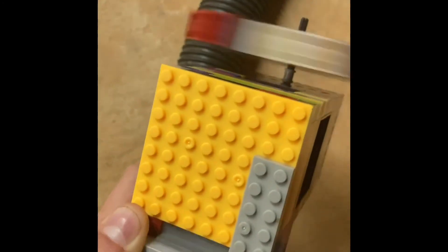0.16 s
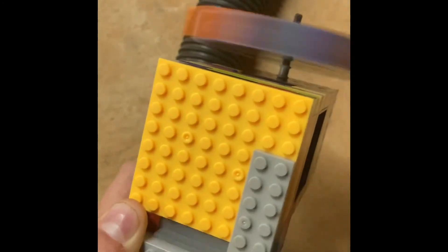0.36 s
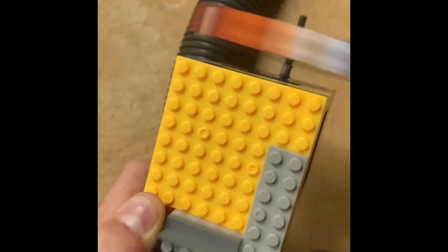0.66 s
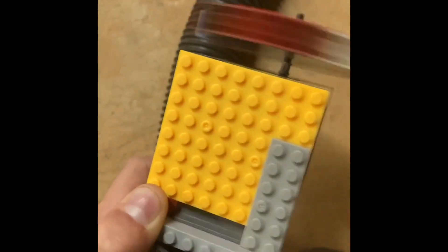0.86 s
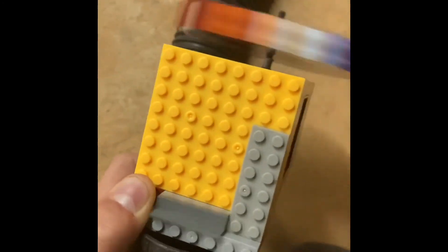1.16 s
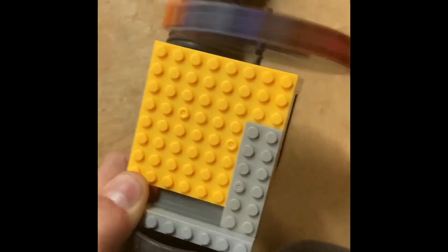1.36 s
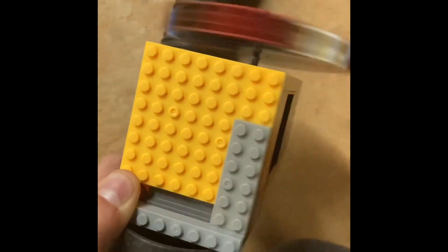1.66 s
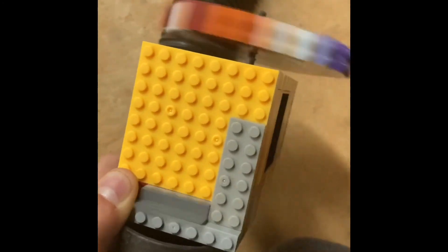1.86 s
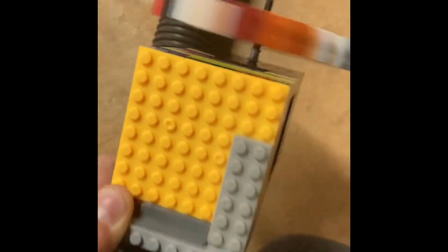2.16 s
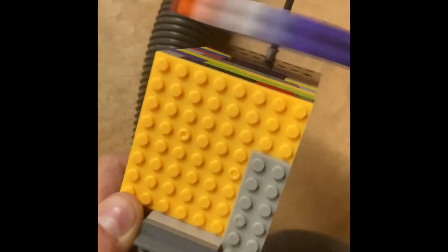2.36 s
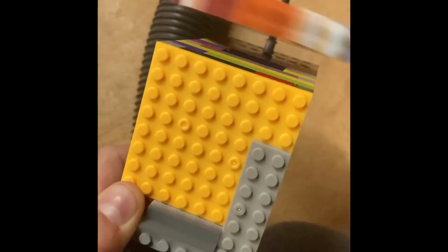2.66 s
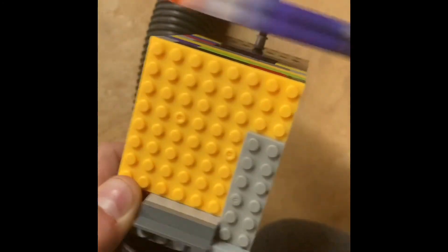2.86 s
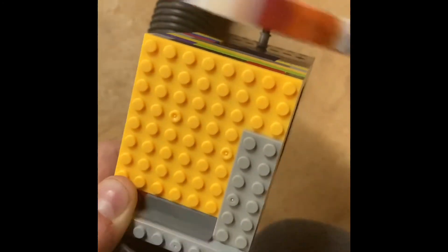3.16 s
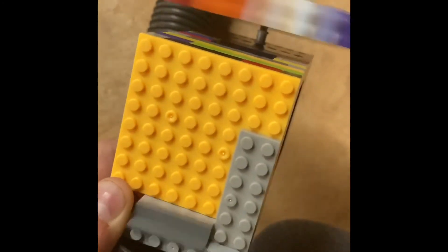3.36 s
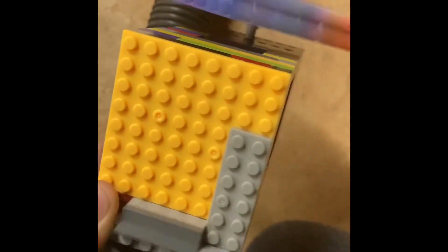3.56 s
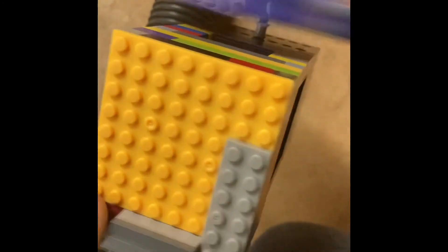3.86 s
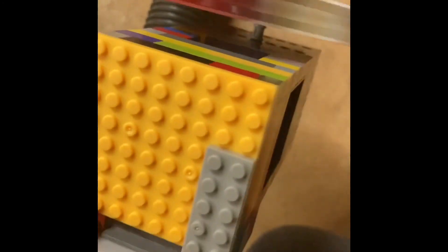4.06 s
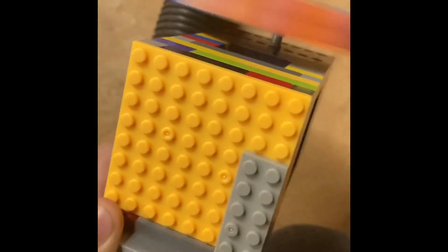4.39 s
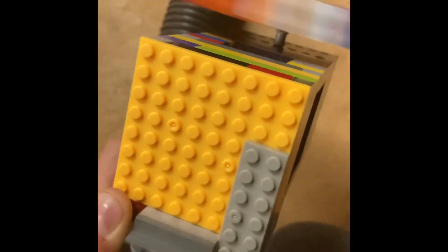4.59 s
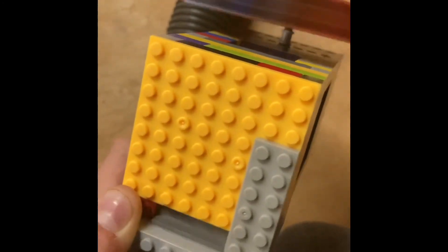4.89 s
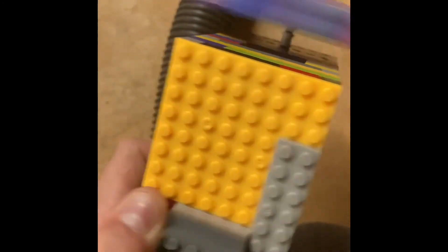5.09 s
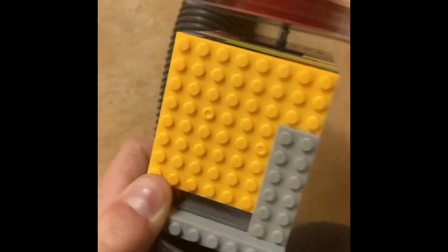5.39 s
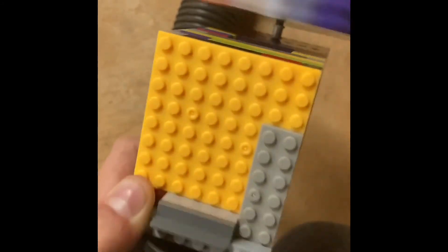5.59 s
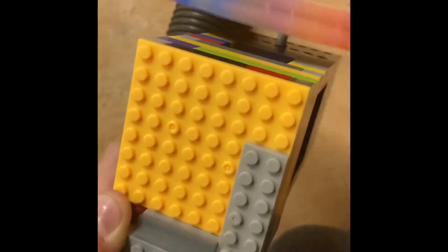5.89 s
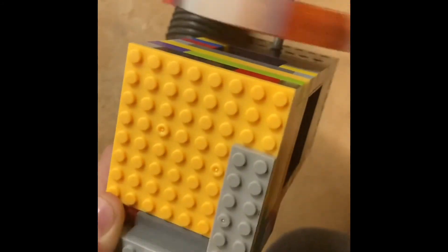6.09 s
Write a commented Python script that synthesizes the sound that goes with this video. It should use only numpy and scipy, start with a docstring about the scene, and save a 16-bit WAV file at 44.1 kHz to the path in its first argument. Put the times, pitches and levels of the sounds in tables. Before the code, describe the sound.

A vacuum's tonal hum and broad airy roar run throughout, driving a small plastic engine close to a stereo microphone. Its rapid knock-squawk-knock chatter starts fast and even, then drags to under six turns a second as bright air leaks and the motor pitch drops. The hiss stops, the rattle quickens and the hum rises, before a brief second leak and recovery. Little room reflection.

```python
"""A vacuum's motor hums over rushing air, and its suction drives a toy piston engine close to the microphone.
On most turns of the flywheel the crank squeaks; the plastic piston knocks, squawks and knocks on its return.
When the hose sits loosely, air hisses through the gap, the hum sinks in pitch and the engine slows.
Hum, squawks and squeaks are sine tones; air is coloured noise; knocks and rubbing are clicks ringing the housing.
It is heard in stereo, with a little of a small room around it."""
import sys
import numpy as np
from scipy import signal
from scipy.fft import rfft, irfft
from scipy.io import wavfile
from scipy.ndimage import uniform_filter1d

SR = 44100
rng = np.random.default_rng(int(sys.argv[2]) if len(sys.argv) > 2 else 0)


def bounce(signal):
    """Save signal as a 16-bit WAV file at the path given by the first command-line argument."""
    frames = np.transpose(np.atleast_2d(signal))
    limited = np.clip(frames, -1, 1)
    pcm = np.round(limited * 32767).astype(np.int16)
    wavfile.write(sys.argv[1], SR, pcm)


N = 275184
TIME = np.arange(N) / SR  # s
FREQS = np.maximum(np.fft.rfftfreq(N, 1 / SR), 1)  # Hz, kept above zero for logarithms
TOP_HZ = 15720  # upper limit of the recorder
START_TURN = .4745  # flywheel angle at the start, turns
CRUISE_TURNS_PER_S = 8
STROKE_DB, STROKE_DB_PER_SPEED = -21.5, 2.06  # rubbing at cruising speed, and rise per extra turn a second
RUSH_DB = -30.5  # the vacuum's roar at the peak of its throb, before slow wavering
VALVE_HZ = 5650  # the valve shapes the hiss above this

# Speed of the flywheel. Each row: time in seconds, speed in turns per second.
FLYWHEEL_SPEED = [(0.0, 8.557), (0.443, 8.455), (0.807, 8.225), (1.006, 7.703), (1.736, 6.777),
                  (1.985, 6.299), (3.129, 5.728), (3.486, 5.998), (3.906, 7.29), (4.127, 8.019),
                  (4.377, 8.345), (5.047, 8.441), (5.264, 7.841), (5.65, 7.015), (5.868, 7.718),
                  (6.24, 8.166)]
# The vacuum motor, slowed while the hose leaks. Each row: time in seconds, pitch of the hum in Hz.
MOTOR_PITCH = [(0, 364.3), (.75, 365.4), (1.45, 353), (2.05, 347.7), (3.05, 345.2), (3.55, 347.5),
               (4.2, 365.3), (4.6, 366), (5.12, 364.3), (5.65, 352.5), (6.08, 363.5)]
# Level of the hum. Each row: time in seconds, level in dB.
HUM_LEVEL = [(0, -27.5), (.8, -28), (1.05, -28.5), (1.35, -25), (1.9, -30), (2.2, -32.5), (3, -36),
             (3.55, -32.5), (3.8, -26.5), (4.15, -29.5), (4.7, -29.5), (5.6, -26), (6.1, -29.5)]
# Overtones of the hum. Each row: multiple of its pitch, relative level in dB.
HUM_OVERTONES = [(2, 0), (3, -15), (4, -13), (6, -17)]
# Common level of those overtones. Each row: time in seconds, level in dB.
OVERTONE_LEVEL = [(0, -41), (.55, -38.8), (.8, -42), (1.2, -37.5), (1.9, -36.8), (2.8, -37.3), (3.5, -39),
                  (4.1, -39.3), (4.85, -38.5), (5.1, -43), (5.55, -39.5), (6.24, -40.5)]
# Colour of the vacuum's rush. Each row: frequency in Hz, relative density in dB per Hz.
RUSH_COLOUR = [(25, -52), (60, -22), (125, -6), (182, 5.5), (230, 1), (280, -7), (430, -4), (510, -17),
               (620, -19), (850, -9), (1600, -7.5), (2200, -10.5), (2750, -17.5), (3300, -10),
               (4600, -13.5), (5600, -16.5), (8000, -16.5), (11000, -23), (15500, -38)]
# Power of the rush that arrives from all round. Each row: frequency in Hz, share from 0 to 1.
DIFFUSE_SHARE = [(60, .01), (350, .01), (700, .4), (1400, .6), (2500, .75), (4000, .65), (5500, .3),
                 (10000, .25)]
# Colour of the draught's buffeting. Each row: frequency in Hz, relative density in dB per Hz.
BUFFET_COLOUR = [(25, -50), (38, -49), (52, -6), (68, 5), (110, 0.5), (200, -10), (400, 0.5), (600, -19),
                 (1500, -24.5)]
# Buffeting at the hose mouth. Each row: time in seconds, relative level in dB.
BUFFET_LEVEL = [(0, -37), (1.12, -37.5), (1.22, -30), (2, -35.5), (2.6, -30.5), (3.33, -32), (3.52, -44),
                (4.6, -39), (5.5, -41), (6.24, -39)]
# Colour of the hiss at the loose hose. Each row: frequency in Hz, relative density in dB per Hz.
LEAK_COLOUR = [(500, -13), (2600, -7), (3900, -7.8), (4700, -8.5), (5500, -13), (6500, -10), (8000, -5.3),
               (9000, -2.9), (10000, -.3), (11000, .8), (13000, -2.8), (14000, -6.2), (15500, -7.3)]
# Hiss, strong each time the hose sits loosely. Each row: time in seconds, relative level in dB.
LEAK_LEVEL = [(0, -42.5), (.43, -43), (.57, -34.5), (.95, -30), (1.9, -32), (3.53, -33.5), (4.07, -47),
              (5.02, -48), (5.15, -31.5), (5.53, -32), (5.82, -50), (6.24, -48)]
# Valve opening around each power stroke.
# The one row: centre in turns after the stroke, spread in turns, swell of the hiss in dB.
VALVE_SWELL = (-.03, .115, 3.8)
# Where the piston rubs within a turn.
# Each row: turns after the power stroke, spread in turns, relative level in dB.
RUBS = [(-.085, 0.049, -16), (0.01, 0.093, -8), (.4, 0.05, -17), (.6, 0.25, -22)]
# Squeaks of the crank, mostly buried under the rushing air while the engine crawls.
# Each row: time in seconds, relative level in dB, pitch in Hz.
SQUEAKS = [(0.032, -24, 9720), (0.149, -23, 9750), (0.266, -25, 9700), (0.385, -23, 9840),
           (0.502, -23, 9940), (0.622, -24, 9860), (0.745, -30.0, 9920), (0.869, -30, 9810),
           (0.99, -23, 9700), (1.123, -21.5, 9660), (1.255, -18, 9650), (1.392, -20, 9610),
           (1.532, -16.5, 9600), (1.677, -17, 9540), (1.825, -19.5, 9480), (1.98, -17.5, 9600),
           (2.14, -21, 9580), (2.299, -29, 9530), (2.46, -27, 9650), (2.795, -27, 9480),
           (3.794, -22.5, 9500), (3.933, -21.0, 9670), (4.066, -27.5, 9770), (4.191, -22, 9680),
           (4.313, -26, 9710), (4.433, -24.5, 9670), (4.552, -23.5, 9770), (4.672, -24.5, 9690),
           (4.791, -25, 9700), (4.91, -25.5, 9720), (5.028, -21.5, 9640), (5.148, -29, 9680),
           (5.277, -24, 9960), (5.404, -24.5, 9610), (5.539, -25, 9560), (5.68, -23, 9540),
           (5.816, -26.5, 9700), (5.946, -23.0, 9700), (6.073, -25.5, 9800), (6.197, -24.5, 9680)]
# Knocks of the loose piston, bright just before a power stroke and duller on its return.
# Each row: start in seconds, relative level in dB, brightness of the contact in Hz.
KNOCKS = [(0.052, 1, 2800), (0.115, 1, 1500), (0.167, 0, 2800), (0.233, 3.5, 1500), (0.285, -2, 2900),
          (0.35, 1, 1500), (0.402, -0.5, 2800), (0.467, 0, 1500), (0.519, 1, 2800), (0.584, -2, 1500),
          (0.639, -6, 2800), (0.705, 1, 1500), (0.76, -10, 2720), (0.827, -8, 1500), (0.884, -1, 2820),
          (0.952, 1, 1500), (1.01, -1, 2700), (1.079, -6, 1500), (1.143, -14.5, 2760), (1.215, -3, 1500),
          (1.279, -9.5, 2840), (1.347, 0, 1500), (1.415, -15.5, 2800), (1.486, -1, 1500), (1.631, 1, 1500),
          (1.709, -30.5, 2830), (1.776, -2, 1500), (1.927, -10, 1500), (1.999, -12.0, 2800),
          (2.08, -1, 1500), (2.169, -13, 2930), (2.243, 1, 1500), (2.33, -9, 2800), (2.404, 0.5, 1500),
          (2.484, -13, 2850), (2.562, 2, 1500), (2.731, -5, 1520), (2.829, -16.5, 2950), (2.997, -14, 2800),
          (3.08, 0.5, 1490), (3.171, -3, 2800), (3.257, -3, 1460), (3.35, -13.0, 2800), (3.425, -2, 1460),
          (3.515, -16, 2800), (3.591, 0.5, 1430), (3.737, -8.0, 1500), (3.815, -16.0, 2800),
          (3.89, 0, 1500), (3.952, -13, 2740), (4.025, -4.5, 1500), (4.084, -3, 2800), (4.153, -1, 1480),
          (4.209, 1.0, 2800), (4.276, 2, 1500), (4.331, -6, 2800), (4.397, 2, 1520), (4.451, -3.5, 2800),
          (4.517, 0, 1500), (4.571, -6.0, 2800), (4.636, 0, 1510), (4.69, -7, 2800), (4.756, -1, 1500),
          (4.809, -4, 2820), (4.875, 0.0, 1500), (4.928, -2, 2800), (4.993, 3, 1500), (5.047, -10, 2720),
          (5.112, -4.5, 1500), (5.17, -7, 2800), (5.234, -9, 1500), (5.293, -7, 2700), (5.365, -9, 1500),
          (5.424, -10, 2760), (5.5, -16, 1500), (5.564, -17, 2700), (5.635, -16, 1500), (5.704, -15, 2720),
          (5.777, -4, 1500), (5.83, -15.5, 2720), (5.917, -3, 1500), (5.969, -1, 2850), (6.034, -1, 1500),
          (6.092, 2, 2800), (6.16, 1, 1500), (6.216, -11, 2670)]
# Power strokes, one a turn. Each row: time in seconds, relative level of the squawk in dB, its pitch in Hz,
# relative level of the lower groan in dB, its pitch in Hz.
STROKES = [(0.062, -25.5, 1990, -35, 930), (0.18, -21, 2000, -27, 935), (0.297, -22, 2020, -27, 960),
           (0.413, -25.5, 2010, -28, 915), (0.532, -26, 2060, -31, 910), (0.651, -23, 2000, -24.5, 940),
           (0.774, -25.5, 2000, -29, 930), (0.897, -32, 1950, -31, 930), (1.023, -35, 1920, -31, 920),
           (1.154, -28.5, 1960, -28, 965), (1.289, -26.5, 2010, -27, 960), (1.427, -25.0, 1980, -33.5, 925),
           (1.569, -31.0, 1970, -33, 960), (1.719, -28, 2080, -30, 970), (1.864, -30.0, 1990, -34, 860),
           (2.02, -30.0, 1970, -30.5, 870), (2.181, -26, 2040, -30, 930), (2.34, -26.5, 2000, -30, 930),
           (2.501, -30, 1980, -35.0, 970), (2.671, -26, 2040, -45.5, 910), (2.84, -24, 1970, -28, 880),
           (3.015, -25, 1970, -26, 910), (3.189, -23.5, 1970, -28, 910), (3.361, -26.5, 2000, -34, 930),
           (3.527, -27.0, 2030, -38, 920), (3.684, -29.5, 1970, -32, 870), (3.831, -25, 1980, -30, 870),
           (3.969, -27, 1980, -26, 890), (4.097, -30.5, 2050, -25, 880), (4.222, -23.5, 2010, -27.5, 910),
           (4.344, -20, 2000, -30, 890), (4.464, -22, 2050, -34.5, 870), (4.583, -22, 2010, -28, 900),
           (4.703, -22, 2020, -27, 900), (4.821, -21, 2000, -32, 910), (4.941, -21.5, 2010, -30, 900),
           (5.059, -27, 2060, -40, 860), (5.18, -25.5, 2000, -33.0, 940), (5.31, -32, 2080, -30, 950),
           (5.436, -25.5, 1970, -30, 930), (5.573, -30.5, 1950, -26, 920), (5.716, -23.5, 1990, -27, 870),
           (5.851, -24.5, 2010, -26.0, 890), (5.978, -27.0, 2030, -27, 900), (6.106, -25, 2010, -29, 900),
           (6.229, -31, 1930, -26.5, 930)]
# Resonances of the brick housing. Each row: frequency in Hz, width in Hz, relative level in dB.
HOUSING = [(758, 103, 5.5), (964, 98, 5), (1235, 105, 6), (1597, 205, 7), (2226, 720, 6.5),
           (2420, 710, 2.5), (3180, 430, -3.5), (3700, 1800, -2), (9300, 1600, -4.5)]
# The room's share of the sound. Each row: frequency in Hz, level in dB.
ROOM_SHARE = [(250, -28), (700, -9), (3000, -8), (9000, -12)]
# Stereo spread. Each row: frequency in Hz, phase between left and right in radians.
STEREO_PHASE = [(430, 0), (700, -2.4), (1000, -6.3), (1400, -5.4), (3000, -4.5), (4200, -4.4), (5650, -3.1),
                (8000, -.2), (9200, .3), (11000, 2.7), (12400, 3.5), (14000, 6), (16000, 6.4)]
# Stereo balance, the right mostly louder in the middle range.
# Each row: frequency in Hz, left minus right in dB.
STEREO_BALANCE = [(60, -2.7), (200, -1.7), (380, 1), (700, -6), (1400, -3.6), (2200, -5.6), (4200, -.5),
                  (6000, 0)]


def undb(db):
    """Decibels to gain."""
    return 10 ** (np.asarray(db) / 20)


def unit(x):
    """Scale to rms 1."""
    return x / np.sqrt(np.mean(x ** 2))


def curves(table):
    """Each column of a time table at every sample."""
    s, *columns = np.transpose(table)
    return [np.interp(TIME, s, column) for column in columns]


def spectra(table):
    """Each column of a frequency table at every bin, interpolated over log frequency."""
    hz, *columns = np.transpose(table)
    return [np.interp(np.log(FREQS), np.log(hz), column) for column in columns]


def noise(colour):
    """Noise of a given colour, rms 1."""
    white = rfft(rng.standard_normal(N))
    return unit(irfft(white * undb(spectra(colour)[0]), N))


def walk(rate):
    """Random levels drawn `rate` times a second, joined by straight slopes; rms 1."""
    hold = max(int(SR / rate), 1)
    steps = rng.standard_normal(N)[np.arange(N) // hold]
    return unit(uniform_filter1d(steps, hold))


def lobe(turn, centre, spread):
    """A bell-shaped swell at one place in every turn."""
    distance = (turn - centre + .5) % 1 - .5
    return np.exp(-.5 * (distance / spread) ** 2)


def chirps(events, length_s, rise):
    """A short rising tone for each (s, dB, Hz): plastic sticking and slipping as it speeds up."""
    out = np.zeros(N)
    lengths = np.broadcast_to(length_s, len(events))
    starts = rng.random(len(events))  # cycles
    for (s, db, hz), length, start in zip(events, lengths, starts):
        near = np.abs(TIME - s) < length
        t = TIME[near] - s
        cycles = start + hz * (t + rise * t ** 2 / (2 * length))
        envelope = np.exp(-np.abs(2 * t / length) ** 4)
        out[near] += np.sqrt(2) * undb(db) * envelope * np.sin(2 * np.pi * cycles)
    return out


def strike(blows, chatter_s=0.00498, chatter_size=0.4, count=4):
    """A blow for each (s, dB, Hz); it chatters briefly, and is dulled above that frequency."""
    out, span = np.zeros(N + SR), SR // 50
    chatter = rng.random((len(blows), 2, count))
    for (s, db, contact_hz), (delays, sizes) in zip(blows, chatter):
        contacts = np.zeros(span)
        contacts[(SR * chatter_s * delays).astype(int) % span] = chatter_size * (2 * sizes - 1)
        contacts[0] = 1
        at = max(int(s * SR), 0)
        b, a = signal.butter(2, min(contact_hz, TOP_HZ), fs=SR)  # the yielding plastic
        out[at:at + span] += undb(db) * signal.lfilter(b, a, contacts)
    return out[:N]


def flywheel():
    """The flywheel's angle in turns: its speed summed over time, whole near each power stroke."""
    return START_TURN + np.cumsum(curves(FLYWHEEL_SPEED)[0]) / SR


def motor(buffet_db, flutter_db=-9, tremble=0.00079, waver_db=1.5):
    """The motor's hum and its wavering overtones; the draught makes the fundamental flutter."""
    hz, hum_db = curves(MOTOR_PITCH)[0], curves(HUM_LEVEL)[0]
    angle = 2 * np.pi * np.cumsum(hz * (1 + tremble * walk(40))) / SR
    hum = undb(hum_db + .5 * walk(25)) * np.sin(angle)
    unsteady = (walk(45) * np.sin(angle) + walk(45) * np.cos(angle)) / 2
    flutter = undb(buffet_db + flutter_db) * unsteady
    overtones = sum(undb(db + waver_db * walk(12)) * np.sin(k * angle) for k, db in HUM_OVERTONES)
    return np.sqrt(2) * (hum + flutter + undb(curves(OVERTONE_LEVEL)[0]) * overtones)


def rush(turn, swell_db=1):
    """The vacuum's broad roar, throbbing a little with the engine: unrelated direct, left and right streams."""
    streams = np.array([noise(RUSH_COLOUR) for _ in range(3)])
    throb_db = swell_db * (lobe(turn, 0.0057, 0.17) - 1.0)
    return streams * undb(RUSH_DB + throb_db + .5 * walk(9.3))


def draught(turn, buffet_db, gain_db=1, dip_db=4, lump_db=1.27):
    """Low buffeting of the air stream, which comes in lumps and weakens briefly at each power stroke."""
    lumps = undb(lump_db * walk(21.98))
    level_db = buffet_db + gain_db - dip_db * lobe(turn, 0.019, 0.17)
    return noise(BUFFET_COLOUR) * lumps * undb(level_db)


def leak(turn, hiss_db, gain_db=8.5, rough_db=1.5, gust_db=1.07):
    """Air hisses past the hose: a rough lower part, and a bright part that swells as the valve moves each turn."""
    centre, spread, swell_db = VALVE_SWELL
    air = noise(LEAK_COLOUR)
    low = irfft(rfft(air) / (1 + (FREQS / VALVE_HZ) ** 8), N)
    bright = (air - low) * undb(swell_db * (lobe(turn, centre, spread) - .4) + .6 * walk(30))
    rough_low = low * undb(rough_db * walk(150) + gust_db * walk(32))
    return (rough_low + bright) * undb(hiss_db + gain_db)


def overspeed():
    """Turns per second above cruising speed."""
    return curves(FLYWHEEL_SPEED)[0] - CRUISE_TURNS_PER_S


def stroke_db():
    """Level of the rubbing: the piston's force follows the engine's speed."""
    return STROKE_DB + STROKE_DB_PER_SPEED * overspeed()


def rubbing(turn, slips_per_s=1100, slip_db=4.5, sliding_db=-14, rasp_db=-2):
    """The piston slides in tiny random slips, hardest around the ends of its stroke."""
    happens = rng.random(N) < slips_per_s / SR
    direction = rng.choice([-1, 1], N)
    slips = happens * direction * undb(slip_db * rng.standard_normal(N).clip(-2, 2))
    pressure = undb(sliding_db) + sum(undb(db) * lobe(turn, centre, spread) for centre, spread, db in RUBS)
    return unit(slips) * pressure * undb(stroke_db() + rasp_db)


def faint_clicks(clicks_per_s=32, click_db=-15, scatter_db=3.5, contact_hz=3600):
    """Faint random clicks add grain to the engine's clatter."""
    at = np.flatnonzero(rng.random(N) < clicks_per_s / SR)
    db = click_db + scatter_db * rng.standard_normal(N)
    return strike([(TIME[i], db[i], contact_hz) for i in at])


def crank(squeak_db=2.0, tick_db=-8):
    """The crank squeaks high about a quarter turn before most strokes, with a faint, sharp click at its peak."""
    squeak = chirps(SQUEAKS, length_s=.004, rise=.035)
    tick = strike([(s, db, TOP_HZ) for s, db, hz in SQUEAKS])
    return squeak * undb(squeak_db + walk(1500)) + undb(tick_db) * tick


def knocking(knock_db=0.0, thud_db=15, thud_hz=1700):
    """The loose piston knocks as its load changes, out and back, and thuds under each squawk."""
    thuds = strike([(s, db, thud_hz) for s, db, *_ in STROKES])
    return undb(knock_db) * strike(KNOCKS) + undb(thud_db) * thuds


def piston(turn):
    """Rubbing, knocking and faint clicks ring the resonances of the brick housing."""
    body = 0
    for k, (hz, width, db) in enumerate(HOUSING):
        detuning = (FREQS ** 2 - hz ** 2) / (FREQS * width)
        body = body + (-1) ** k * undb(db) / (1 + 1j * detuning)  # neighbours ring in opposite sense
    body = body / np.sqrt(np.mean(np.abs(body) ** 2))
    return irfft(rfft(rubbing(turn) + knocking() + faint_clicks()) * body, N)


def squeals(squawk_db=-1.0, groan_db=1.0, squawk_s=0.0088, groan_s=0.0071, drag=0.91, rough_db=2.0):
    """The piston squawks roughly on two pitches at each stroke, for longer when it moves slowly."""
    strokes = np.array(STROKES)
    speed = np.interp(strokes[:, 0], *np.transpose(FLYWHEEL_SPEED))
    stretch = (CRUISE_TURNS_PER_S / speed) ** drag
    squawk = chirps(strokes[:, [0, 1, 2]], squawk_s * stretch, rise=.12)
    groan = chirps(strokes[:, [0, 3, 4]], groan_s * stretch, rise=.08)
    return (undb(squawk_db) * squawk + undb(groan_db) * groan) * undb(rough_db * walk(700))


def room(x, t60_s=0.12):
    """Short reflections of a small room, as decaying noise that differs on each side."""
    decay = undb(-60 * TIME / t60_s) * (TIME > .002)  # silent for the first 2 ms
    tails = np.array([unit(rng.standard_normal(N) * decay) / np.sqrt(N) for _ in range(2)])
    return irfft(rfft(x) * rfft(tails) * undb(spectra(ROOM_SHARE)[0]), N)


def scene(spray_db=-3):
    """Direct sound in two channels that differ in phase, with room reflections and roar from all round."""
    turn = flywheel()
    hiss_db, buffet_db = curves(LEAK_LEVEL)[0], curves(BUFFET_LEVEL)[0]
    hiss = leak(turn, hiss_db)
    near = piston(turn) + squeals() + crank() + hiss + draught(turn, buffet_db)
    roar, share = rfft(rush(turn)), spectra(DIFFUSE_SHARE)[0]
    side = np.array([[1], [-1]]) / 2  # left, right
    spread = np.exp(1j * spectra(STEREO_PHASE)[0] * side)
    direct = (rfft(near + motor(buffet_db)) + np.sqrt(1 - share) * roar[0]) * spread
    reflected = rfft(room(near + hiss * undb(spray_db)))  # extra hiss sprays into the room
    around = reflected + np.sqrt(share) * roar[1:]
    return irfft((direct + around) * undb(spectra(STEREO_BALANCE)[0] * side), N)


def record(dry):
    """The recorder cuts the top steeply, with an elliptic low-pass."""
    return signal.sosfilt(signal.ellip(10, .2, 80, TOP_HZ, fs=SR, output="sos"), dry)


dry = scene()
out = record(dry)
bounce(out)
```